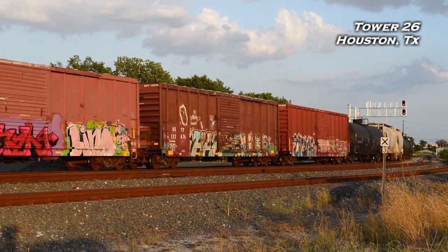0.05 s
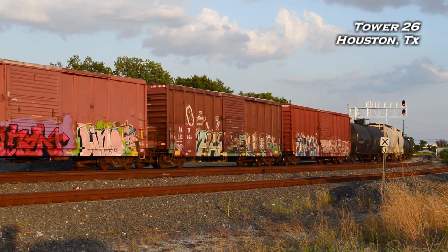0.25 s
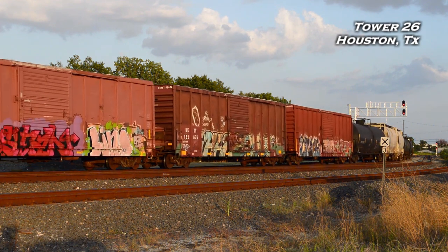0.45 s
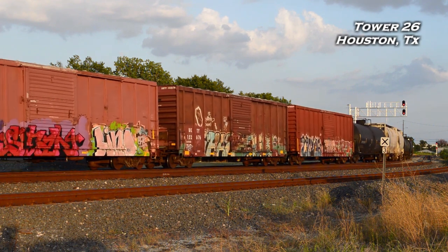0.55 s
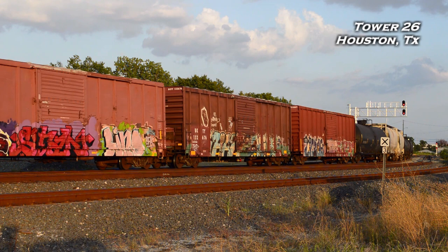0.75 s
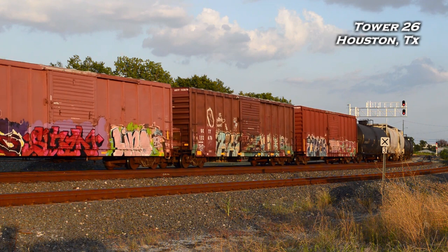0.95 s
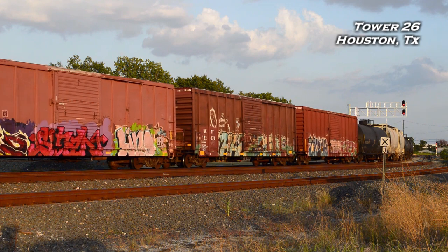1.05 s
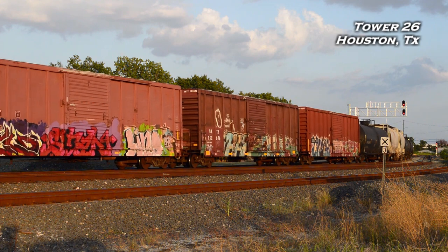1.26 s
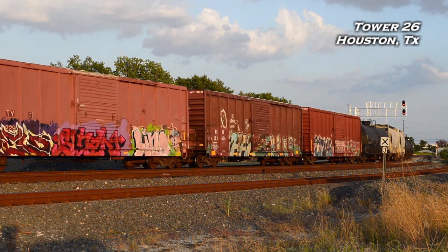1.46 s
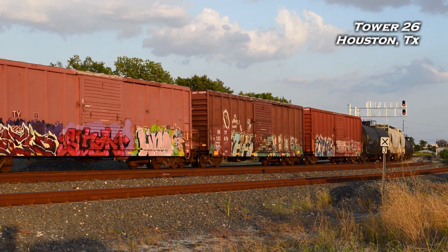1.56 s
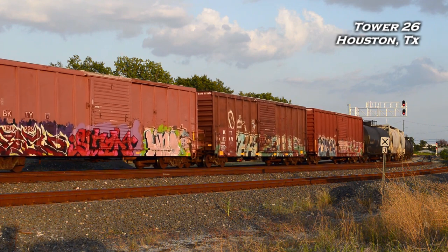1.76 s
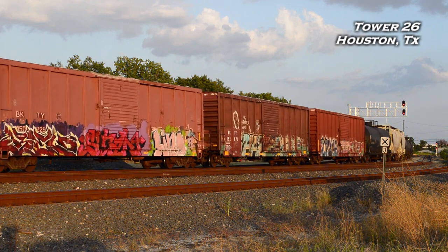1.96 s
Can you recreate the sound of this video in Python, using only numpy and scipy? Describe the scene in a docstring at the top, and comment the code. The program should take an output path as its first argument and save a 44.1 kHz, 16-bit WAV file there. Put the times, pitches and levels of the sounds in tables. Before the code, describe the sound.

Harsh high-pitched train wheel squeal bites in over low rumble, rings off, then metal knocks

```python
"""Freight cars roll through a curve: shaped noise lays a steady low rumble and a faint rail hiss.
A flange brushes the rail lightly, then bites: grinding noise, and a squeal of wheel modes that trade
strength, with stick-slip overtones and a sum tone, all roughened by judder. The flange lets go and the
wheel rings on. A loose steel part knocks twice, with noise bursts and damped modes, then a tiny squeak."""
import sys
import numpy as np
from scipy import signal
from scipy.fft import rfft, irfft
from scipy.io import wavfile
from scipy.ndimage import uniform_filter1d

SR = 44100
rng = np.random.default_rng(int(sys.argv[2]) if len(sys.argv) > 2 else 0)


def put_to_file(sound):
    """Save the sound as 16-bit audio at rate SR, in the file named by the first command-line argument."""
    columns = np.atleast_2d(sound).T  # one column per channel
    safe = np.clip(columns, -1, 1)
    whole_steps = np.round(safe * 32767)
    wavfile.write(sys.argv[1], SR, whole_steps.astype(np.int16))


N = 88200

# Swells of the six strong wheel modes. Each row: time in seconds, level in dB before the tone's gain.
RING_1 = [(0.2, -67), (0.224, -53), (0.42, -43), (0.936, -39), (0.986, -27.5), (1.302, -44), (1.452, -27),
          (1.612, -30), (2.0, -43)]
RING_2 = [(0.2, -73), (0.22, -32), (0.25, -35), (0.474, -30.5), (0.51, -46), (0.54, -53), (1.152, -31.5),
          (1.196, -29.5), (1.236, -34.5), (1.482, -27), (1.68, -36), (2.0, -59)]
RING_3 = [(0.2, -64), (0.22, -37), (0.244, -41), (0.76, -43), (0.8, -36), (1.04, -30), (1.14, -24.5),
          (1.3, -33), (1.52, -41), (1.58, -42), (2.0, -55.5)]
RING_4 = [(0.2, -64), (0.224, -35), (0.244, -29.5), (0.3, -47), (0.404, -21.5), (0.484, -42),
          (0.716, -23.5), (1.02, -16.5), (1.27, -15.5), (1.41, -10.5), (1.52, -15.5), (1.64, -27.5),
          (1.75, -28), (1.833, -41), (1.842, -50), (2.0, -56)]
RING_5 = [(0.2, -61), (0.22, -50), (0.45, -30), (0.866, -36), (0.89, -38), (0.996, -23.5), (1.372, -28),
          (2.0, -57)]
RING_6 = [(0.2, -66), (0.24, -34), (0.39, -25), (0.576, -24.5), (0.75, -18), (0.86, -27), (1.0, -14),
          (1.2, -23.5), (1.225, -29.5), (1.538, -26.5), (1.62, -39), (1.67, -28.5), (1.728, -28),
          (2.0, -36)]
# Stick-slip overtones of the lowest mode, and its sum tone with the sixth.
# Each row: time in seconds, level in dB before the tone's gain.
SECOND = [(.2, -49), (.225, -22), (.38, -23.5), (.5, -18), (.56, -23), (.75, -19), (.81, -30),
          (1.05, -28.5), (1.12, -24), (1.3, -25), (1.52, -30.5), (1.56, -53)]
THIRD = [(0.2, -60), (0.22, -42), (0.454, -31), (0.868, -25), (0.892, -33), (1.15, -29), (1.27, -27),
         (1.42, -22.5), (1.46, -37), (1.54, -31), (1.6, -37)]
FOURTH = [(0.2, -73), (0.232, -27), (0.28, -18), (0.566, -13), (0.724, -21.5), (1.088, -26), (1.216, -34.5),
          (1.508, -26.5), (1.65, -57)]
SUM_TONE = [(0.2, -59), (0.228, -51), (0.656, -31), (0.772, -41.5), (0.97, -23), (1.464, -33.5),
            (1.62, -61), (2.0, -75)]
# Nominal pitch in Hz of the six modes, the three overtones and the sum tone.
TONE_HZ = (1934, 2861, 3819, 4788.5, 5759, 6723, 3865, 5809, 7723, 8653)
# The same tones in order. Each row: level curve, gain in dB, roughness from 0 to 1.
TONES = [(RING_1, 0, 0.22), (RING_2, 0, 0.3), (RING_3, -1.3, 0.31), (RING_4, 0, 0.13), (RING_5, 1, 0.43),
         (RING_6, 0, 0.13), (SECOND, 0, 0.54), (THIRD, -1.1, 0.49), (FOURTH, 0, 0.26), (SUM_TONE, 0, 0.35)]
# Weaker wheel and rail resonances. Each row: pitch in Hz, width in Hz, strongest moment in seconds,
# spread in seconds, level in dB before SIDE_GAIN_DB.
SIDE_TONES = [(938, 54, 0.695, 0.03, -38), (989, 56, 1.28, 0.18, -42), (960, 60, 0.74, 0.66, -49),
              (1852, 22, 0.94, 0.99, -44.5), (2800, 24, 0.68, 0.053, -36), (2957, 61, 0.89, 0.49, -31.5),
              (3190, 42, 0.82, 0.42, -33.5), (3924, 27, 0.55, 0.09, -25), (4270, 23, 0.238, 0.021, -27),
              (4204, 30, 0.87, 0.059, -28), (4105, 140, 0.71, 0.24, -35), (5015, 120, 0.62, 0.23, -30.5),
              (6780, 27, 1.3, 0.067, -30.5), (6805, 58, 0.38, 0.21, -28.5), (7682, 14, .5, .4, -30),
              (8616, 10, .62, .22, -28), (9530, 52, 0.55, 0.62, -40.5), (10840, 110, 0.59, 0.79, -48),
              (10390, 230, 0.6, 0.25, -40), (11700, 720, 0.39, 0.076, -41), (11256, 15, .33, .08, -38),
              (11235, 64, 0.83, 0.22, -44), (13600, 110, .9, 0.72, -55)]
# Faint modes that outlast the contact. Each row: pitch in Hz, level in dB.
LINGERING = [(3155, -50), (4160, -41), (5356, -51), (5610, -51), (7560, -48.5), (8600, -50), (8680, -41),
             (10565, -47.5), (12715, -55), (15075, -57.5)]
# Swells of the flange grinding. Each row: time in seconds, level in dB relative to GRIND_DB.
GRIND = [(.21, -43), (.226, -2), (.3, -9), (.45, -1.5), (.65, -2.5), (.87, 0.5), (1.05, -2), (1.3, -4),
         (1.45, -4), (1.52, -12), (1.6, -23), (1.78, -20), (2, -21.5)]
# Noise colours of the scrape and the light brush. Each row: frequency in Hz, relative dB per Hz.
GRIND_COLOUR = [(700, -13), (1100, -14.5), (1400, -3.5), (1750, -6), (2050, 1.5), (3100, 2.5), (4500, -4),
                (5900, 1.5), (7200, -3), (8500, -4), (9200, -10.5), (10500, -8.5), (12000, -15.5),
                (14000, -27), (15600, -24)]
BRUSH_COLOUR = [(2000, -2), (4000, -1), (5300, 6), (6800, -11), (8300, -1), (10500, -30), (15000, -33)]
# The knock and rebound of the loose part. Each row: start in seconds, relative level in dB.
CLANKS = [(1.809, 0), (1.826, -8.5)]
# Noise colour of the knocks. Each row: frequency in Hz, relative dB per Hz.
CLANK_COLOUR = [(600, -13), (1300, 6), (1700, -2), (2500, 4), (3500, -10), (5000, 6), (7000, -14),
                (11000, -6), (15000, -27)]
# Wheel modes set ringing by the knocks. Each row: pitch in Hz, level in dB for a 0 dB knock, 60 dB decay in
# seconds.
CLANK_MODES = [(1345, -37, 0.11), (2446, -46, 0.21), (2670, -46.5, 1), (3840, -36.5, 0.18),
               (7450, -47, .25), (8670, -46, 0.45), (10500, -50, 0.22), (11210, -55, .1), (14950, -62, .25)]
# Noise colours of the car rumble and the rail hiss. Each row: frequency in Hz, relative dB per Hz.
ROLL_COLOUR = [(12, -48), (20, -39), (36, -6.5), (65, -1), (87, -3.5), (108, -9), (211, -17), (244, -18.5),
               (305, -23), (549, -26), (698, -31.5), (780, -28.5), (900, -30), (1170, -71), (1980, -120)]
RAIL_COLOUR = [(500, -1), (900, 0.5), (1500, 0), (2600, 1), (4000, -5.5), (5500, -5.5), (8000, -13.5),
               (10500, -20), (15500, -25)]

# T60 is the time to fall by 60 dB
BITE_S, BITE_RISE_S, LET_GO_S = 0.2133, 0.028, 1.565
DOPPLER_PER_S, WAVER = 0.001076, 0.000496  # share of pitch lost each second; random share
ROUGHEN_S, ROUGH_WIDTH_HZ, SMOOTH_T60_S = 0.3, 56, 0.5
JUDDER_HZ, JUDDER_SPREAD_HZ, JUDDER_SHARE = 50, 12, 0.25  # share of the roughness power
TWIN_DB, TWIN_SPLIT = -21, 0.002  # relative level; split as a share of the pitch
FLUTTER_DB, FLUTTER_PER_S = 0.5, 30
SIDE_GAIN_DB, FADE_T60_S = 0.5, 0.19
LINGER_T60_S, LINGER_WIDTH_HZ = 0.8, 11
GRIND_DB, GRIND_FLICKER_DB = -24, 0.6
BRUSH_S, BRUSH_SPREAD_S, BRUSH_DB = 0.12, 0.022, -45.5
STEEL_RIPPLE_DB, STEEL_SPACING_HZ = 3.0, 45
TICK_T60_S, TICK_DB = 0.04, -33
CLATTER_T60_S, CLATTER_DB = 0.45, -37.5
CLANK_WIDTH_HZ = 42
SQUEAK_S, SQUEAK_HZ, SQUEAK_SPREAD_S, SQUEAK_DB = 1.952, 9100, 0.0024, -40
ROLL_DB, RAIL_DB = -33, -45
TOP_HZ = 15700


def undb(db):
    """Decibels to gain."""
    return 10 ** (np.asarray(db) / 20)


def clock():
    """Time of every sample in seconds."""
    return np.arange(N) / SR


def curve(rows):
    """Gain that follows (seconds, dB) points."""
    return undb(np.interp(clock(), *np.array(rows).T))


def swell(at, spread):
    """Bell-shaped rise and fall."""
    return np.exp(-((clock() - at) / spread) ** 2 / 2)


def decay(age, t60):
    """Exponential fall of 60 dB in t60 seconds."""
    return np.exp(-np.log(1000) * age / t60)


def noise(colour):
    """Unit noise with a (Hz, dB) spectrum that falls away beyond its ends."""
    hz, db = np.array(colour).T
    f = np.maximum(np.arange(N // 2 + 1) * SR / N, 1)
    gain = undb(np.interp(np.log(f), np.log(hz), db))
    gain = gain * np.minimum(f / hz[0], 1) ** 2 * np.minimum(hz[-1] / f, 1) ** 4
    y = irfft(rfft(rng.standard_normal(N)) * gain, N)
    return y / y.std()


def jitter(width_hz):
    """Complex random motion of unit strength, mostly slower than width_hz."""
    f = np.fft.fftfreq(N, 1 / SR)
    white = rng.standard_normal(N) + 1j * rng.standard_normal(N)
    z = np.fft.ifft(np.fft.fft(white) / (1 + (f / width_hz) ** 2))
    return z / z.std()


def walk(rate):
    """Smoothed random wander with a spread of 1."""
    k = max(int(SR / rate), 1)
    y = uniform_filter1d(jitter(rate).real, k // 2 + 1)
    return y / y.std()


def bite():
    """Onset ramp as the flange bites."""
    return np.clip((clock() - BITE_S) / BITE_RISE_S, 0, 1)


def contact(t60):
    """Rises as the flange bites, holds, and dies away once it lets go."""
    return bite() * decay(np.maximum(clock() - LET_GO_S, 0), t60)


def turning(hz):
    """Rotating phasor whose pitch wavers and sinks slowly as the wheel moves by."""
    pitch = hz * (1 - DOPPLER_PER_S * (clock() - 1) + WAVER * walk(23.8))
    return np.exp(2j * np.pi * np.cumsum(pitch) / SR)


def steel(x):
    """Colours a sound with dense, irregular steel resonances and returns it at unit strength."""
    f = np.arange(N // 2 + 1) * SR / N
    centres = np.arange(0, SR / 2, STEEL_SPACING_HZ)
    ripple = np.interp(f, centres, rng.standard_normal(len(centres)))
    y = irfft(rfft(x) * undb(STEEL_RIPPLE_DB * ripple), N)
    return y / y.std()


def squeal():
    """Strong tones judder together and roughen as the flange digs in, then clear; weak twins beat with them."""
    t, out = clock(), 0
    rubbing = contact(SMOOTH_T60_S) * np.clip((t - BITE_S) / ROUGHEN_S, 0, 1) ** 0.5
    judder_hz = JUDDER_HZ + JUDDER_SPREAD_HZ * walk(FLUTTER_PER_S)
    judder = np.sqrt(2) * np.cos(2 * np.pi * np.cumsum(judder_hz) / SR)
    for hz, (levels, db, rough) in zip(TONE_HZ, TONES):
        share = rough * rubbing
        # one judder common to all tones, plus a random shake of each tone's own
        shake = np.sqrt(JUDDER_SHARE) * judder + np.sqrt(1 - JUDDER_SHARE) * jitter(ROUGH_WIDTH_HZ)
        twin = undb(TWIN_DB) * np.exp(2j * np.pi * (TWIN_SPLIT * hz * t + rng.random()))
        motion = np.sqrt(1 - share ** 2) + share * shake + twin
        # a level curve that ends early dies away from its last point
        ring_out = decay(np.maximum(t - levels[-1][0], 0), FADE_T60_S)
        level = curve(levels) * ring_out * undb(db + FLUTTER_DB * walk(FLUTTER_PER_S))
        out = out + level * (motion * turning(hz)).real
    return np.sqrt(2) * out * bite()


def side_tones():
    """Narrow resonances of wheel and rail, shaken by the friction as the contact point wanders."""
    out = 0
    for hz, width, at, spread, db in SIDE_TONES:
        tone = (jitter(width / 2) * turning(hz)).real
        out = out + undb(db) * swell(at, spread) * tone
    return np.sqrt(2) * undb(SIDE_GAIN_DB) * out * contact(FADE_T60_S)


def lingering():
    """Faint, lightly damped wheel modes that outlast the contact."""
    out = sum(undb(db) * (jitter(LINGER_WIDTH_HZ) * turning(hz)).real for hz, db in LINGERING)
    return np.sqrt(2) * out * contact(LINGER_T60_S)


def grinding():
    """A light brush, then the harsh, uneven scrape of flange on rail, as steel-coloured noise."""
    flicker = undb(GRIND_DB + GRIND_FLICKER_DB * walk(86))
    scrape = steel(noise(GRIND_COLOUR)) * curve(GRIND) * flicker
    brush = undb(BRUSH_DB) * swell(BRUSH_S, BRUSH_SPREAD_S) * noise(BRUSH_COLOUR)
    return scrape + brush


def knocks(t60):
    """Envelope of the knock and rebound, with 1 ms rises, summed as power."""
    power = 0
    for at, db in CLANKS:
        age = np.maximum(clock() - at, 0)
        power = power + (undb(db) * (1 - np.exp(-age / 0.001)) * decay(age, t60)) ** 2
    return np.sqrt(power)


def clank():
    """A loose steel part knocks twice: hard tick, short clatter and damped ring; a tiny squeak follows."""
    tick = undb(TICK_DB) * knocks(TICK_T60_S)
    clatter = undb(CLATTER_DB) * knocks(CLATTER_T60_S)
    hit = steel(noise(CLANK_COLOUR)) * (tick + clatter)
    ring = 0
    for hz, db, t60 in CLANK_MODES:
        mode = ((1 + jitter(CLANK_WIDTH_HZ) / 2) * turning(hz)).real
        ring = ring + undb(db) * knocks(t60) * mode
    squeak = undb(SQUEAK_DB) * swell(SQUEAK_S, SQUEAK_SPREAD_S) * turning(SQUEAK_HZ).real
    return hit + np.sqrt(2) * ring + squeak


def rolling():
    """Low noise for the rumble of the heavy cars, and steel-coloured noise for the wheels' faint hiss."""
    rumble = noise(ROLL_COLOUR) * undb(ROLL_DB + 0.24 * walk(6.6))
    hiss = steel(noise(RAIL_COLOUR)) * undb(RAIL_DB + 0.27 * walk(17))
    return rumble + hiss


def scene():
    """The train heard from beside the track, in one channel."""
    wheel = squeal() + side_tones() + lingering()
    return (wheel + grinding() + clank() + rolling())[None]


def record(dry):
    """A steep elliptic low-pass cuts the top."""
    return signal.sosfilt(signal.ellip(10, 0.2, 80, TOP_HZ, fs=SR, output="sos"), dry)


dry = scene()
out = record(dry)
put_to_file(out)
```